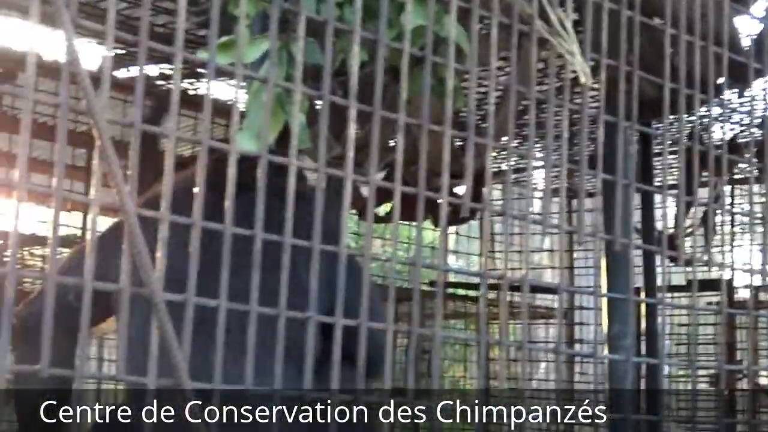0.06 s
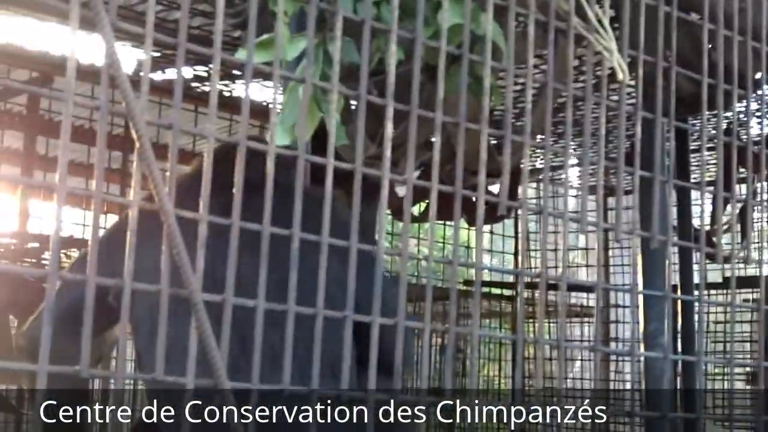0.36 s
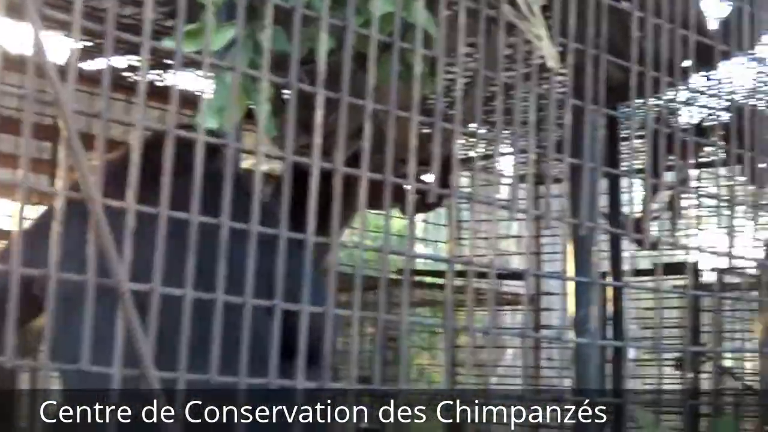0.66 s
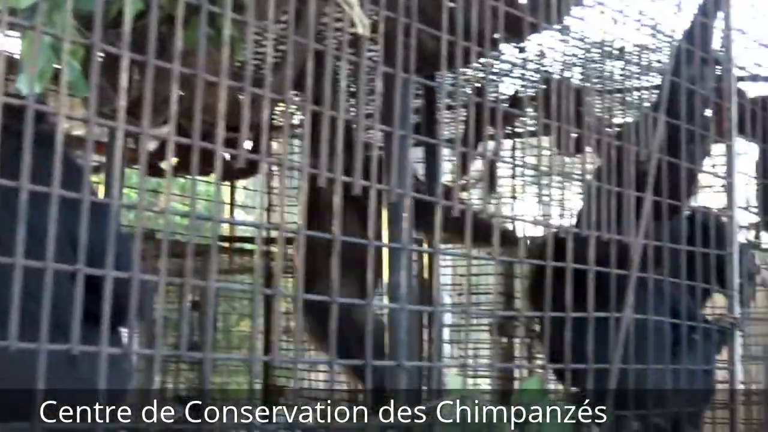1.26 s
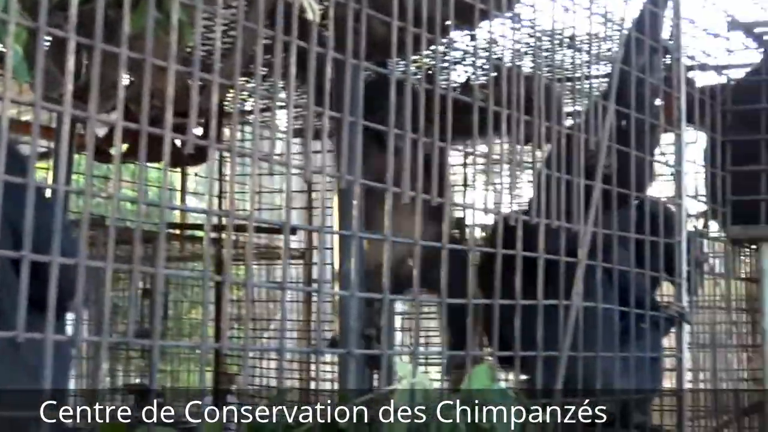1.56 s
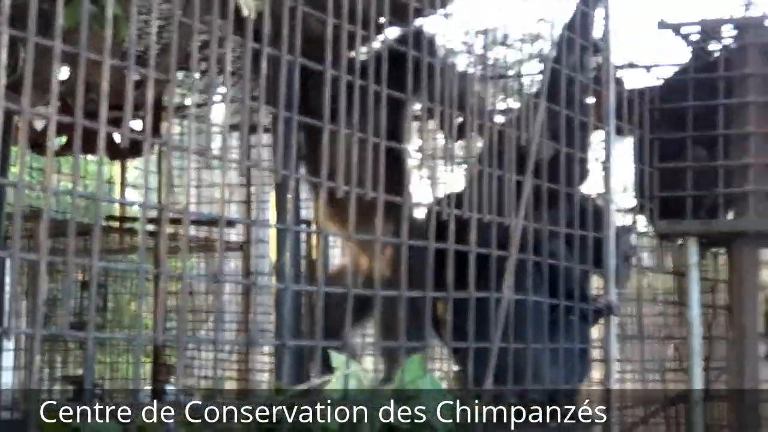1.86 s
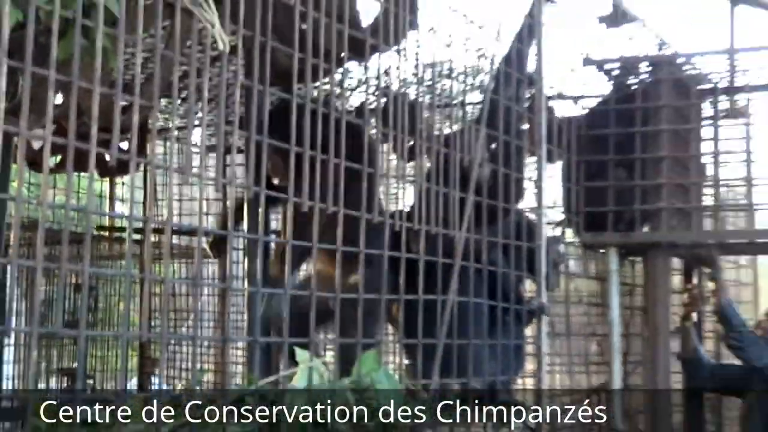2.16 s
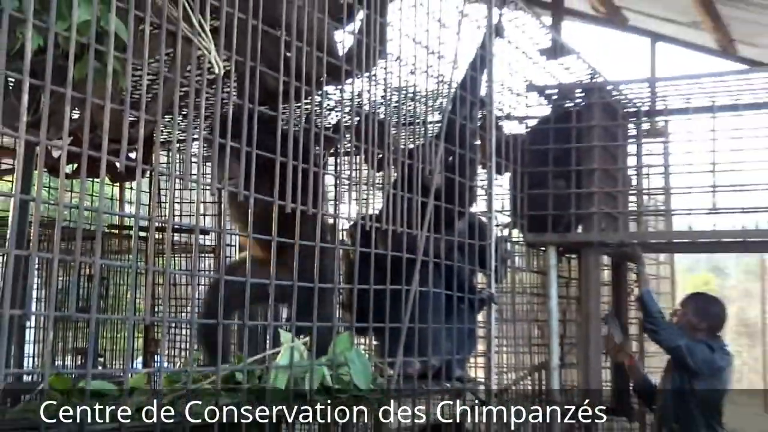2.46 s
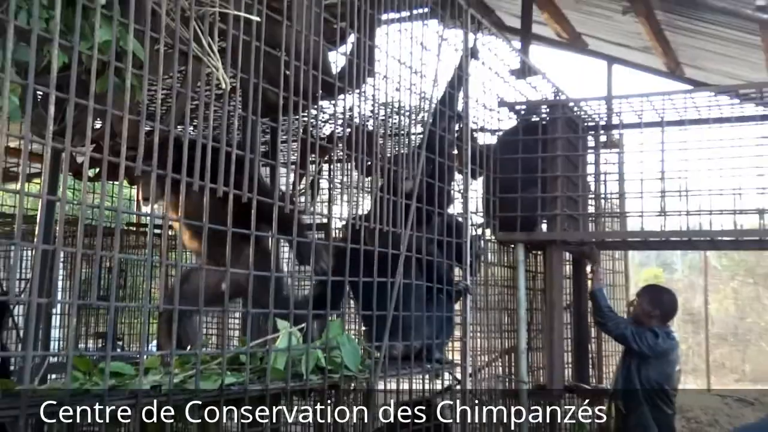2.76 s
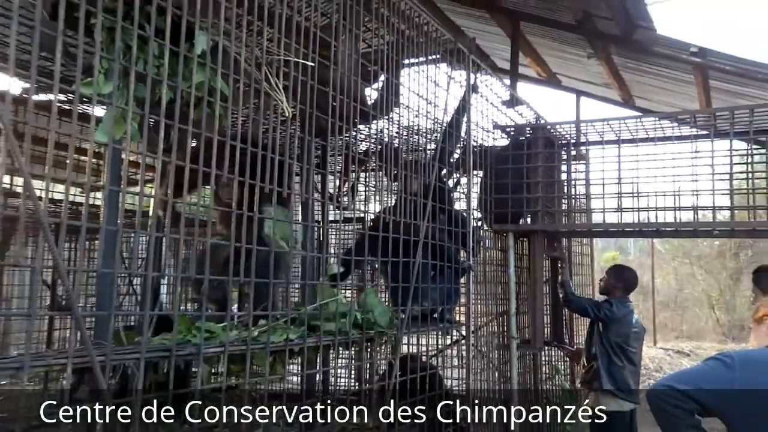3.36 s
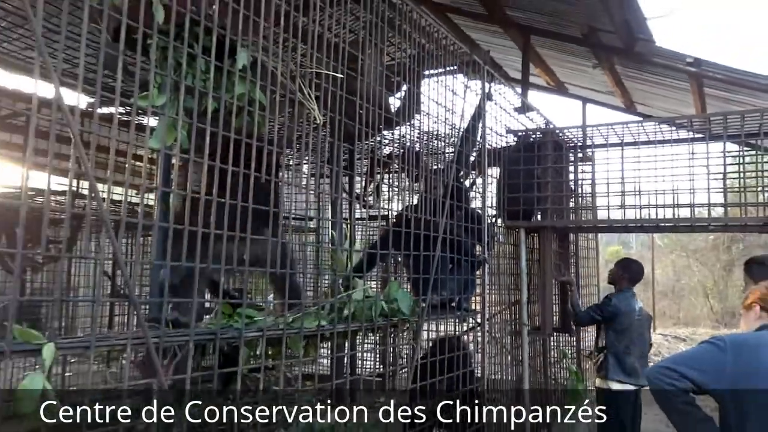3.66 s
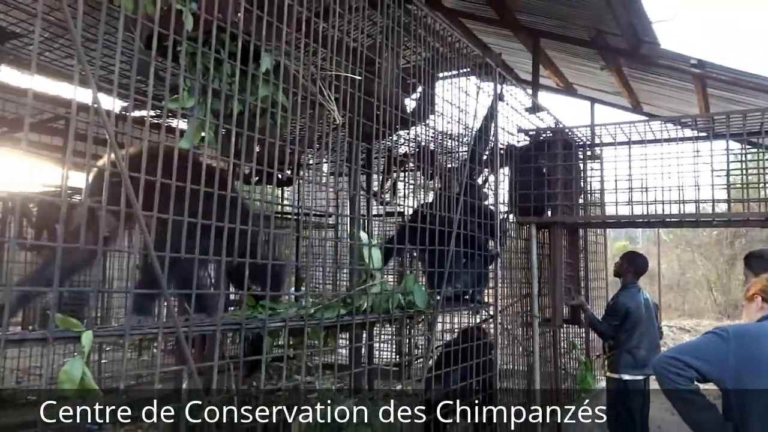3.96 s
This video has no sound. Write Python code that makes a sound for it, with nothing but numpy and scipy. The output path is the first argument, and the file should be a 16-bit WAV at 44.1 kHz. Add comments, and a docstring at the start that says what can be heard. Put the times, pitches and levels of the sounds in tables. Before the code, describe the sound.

Excited chimpanzees scream in quick, harsh bursts, mixed throughout with rising and falling barks and occasional soft hoots. They are heard up close in an outdoor barred enclosure, with a short echo and faint steady background noise.

```python
"""Chimpanzees call excitedly, close by, in a barred enclosure under a sheet roof.
A rasping scream is already ending as the sound begins, over low outdoor noise. Then one animal barks
again and again, each bark rising and falling in pitch, while others answer with screams and a few soft
hoots. Every call is made by vibrating vocal folds and comes with a broad, harsh hiss. The roof throws
each call back and the steel bars ring. Last, a limiter holds the loud calls level."""
import sys
import numpy as np
from scipy import signal
from scipy.fft import rfft, irfft
from scipy.io import wavfile
from scipy.ndimage import minimum_filter1d

SR = 44100
rng = np.random.default_rng(int(sys.argv[2]) if len(sys.argv) > 2 else 0)


def digitize_waveform(pressure):
    """Quantize a signal to 16-bit integers and store it at the path in sys.argv[1].

    Rows of a 2-D input are taken as channels; values are limited to [-1, 1].
    """
    field = np.atleast_2d(pressure).T
    bounded = np.clip(field, -1, 1)
    quanta = np.round(bounded * 32767).astype(np.int16)
    wavfile.write(sys.argv[1], SR, quanta)


N = 176400
TIME = np.arange(N) / SR

# Screams, one a row: (start [s], rise [s], fall [s], start pitch [Hz], top pitch [Hz],
# end pitch [Hz], level [dB], overtones [dB], roughness [0 smooth, about 1 harsh])
SCREAM_CALLS = [ (-.06, 0.034, 0.043, 1144, 1250, 949, -11, 1.5, 1.04),
                (.085, 0.093, 0.089, 1227, 1297, 1135, -8, -0.5, 0.68),
                (.21, 0.054, 0.06, 1122, 1289, 880, 3, 0, 0.62),
                (.345, 0.021, 0.027, 986, 926, 880, -6.5, -12.5, 0.82),
                (.418, 0.05, 0.005, 1349, 1447, 1404, -12.5, -32, 0.6),
                (.533, 0.047, 0.055, 1166, 1327, 809, -5.5, 3, 0.56),
                (.635, 0.019, 0.031, 1193, 1277, 1070, -13, 0.5, 0.83),
                (.835, 0.086, 0.051, 989, 1244, 1124, -11.5, -2, 0.56),
                (.94, 0.033, 0.073, 1353, 1583, 1007, -11, 4.5, 0.94),
                (1.165, 0.055, .07, 989, 1156, 955, -8, -5.5, 0.77),
                (1.346, 0.055, 0.087, 1115, 1670, 1107, -8, 5.5, 0.8),
                (1.512, 0.078, 0.037, 1099, 1212, 848, -10, 1.5, 0.44),
                (1.833, 0.055, 0.097, 1043, 1372, 952, -11.5, 4.5, 0.87),
                (2.116, 0.089, 0.068, 1042, 1163, 1070, -12.5, 1, 0.83),
                (2.30, .05, 0.08, 1380, 1529, 952, -7.5, 4, 0.88),
                (2.365, 0.029, 0.037, 934, 1013, 836, -5, -15, 0.83),
                (2.47, 0.034, 0.07, 1096, 1117, 968, -14, 0, 0.85),
                (2.75, 0.075, 0.046, 1095, 1270, 875, -6.5, 1.5, 0.7),
                (2.865, 0.032, 0.037, 1139, 1238, 995, -16, 5.5, 0.82),
                (3.135, 0.054, 0.081, 935, 1658, 1014, -14, 4, 0.7),
                (3.618, 0.05, 0.042, 1144, 1344, 950, -7.5, 1.5, 0.65),
                (3.925, 0.037, 0.061, 1277, 1529, 1277, -9.5, 3.5, 0.61)]
# Barks: same columns as the screams
BARK_CALLS = [ (.078, 0.059, 0.051, 596.6, 1039, 588, -11, 2, 0.23),
              (.43, .083, 0.04, 448.3, 1066, 698, -11.5, 2.5, 0.22),
              (.818, 0.11, 0.082, 468.2, 1112, 559, -14, -0.5, 0.48),
              (1.125, 0.086, 0.067, 674, 1076, 613, -12, -23, 0.78),
              (1.835, 0.067, 0.082, 624.5, 864, 575, -14, -4.5, 0.37),
              (2.228, .059, 0.073, 544.5, 1106, 587, -3, -0.5, 0.03),
              (2.596, 0.053, 0.084, 520.5, 1083, 535, -4.5, 0, .05),
              (3.012, .06, 0.058, 486.6, 915, 440, -9, -1.5, 0.28),
              (3.565, 0.054, 0.034, 521.4, 912, 597, -10, 1.5, 0.46)]
# Soft hoots and thin held cries: same columns as the screams
HOOT_CALLS = [ (.3, 0.096, 0.088, 1055, 1032, 1067, -19.5, 25, 0),
              (.805, 0.034, 0.0076, 885, 975, 925, -12.5, -19, 0.78),
              (1.797, 0.034, 0.016, 1076, 1170, 1246, -16, -34, 1.04),
              (3.41, 0.029, 0.035, 700, 709, 695, -33.5, -32, 0),
              (3.855, 0.092, 0.038, 770, 919, 830, -16.5, -11, 0.24)]
# How the throat shapes the overtones of screams and hoots: (frequency [Hz], gain [dB])
SCREAM_THROAT = [(1900, 1.5), (2400, -10.5), (2850, -16), (3380, -13.5), (4400, -23.5), (5050, -24),
                 (5600, -27), (8000, -31), (11000, -31.5), (14500, -38)]
# How the throat shapes the overtones of barks: (frequency [Hz], gain [dB])
BARK_THROAT = [(900, 13), (1400, 5.5), (1750, -8), (2200, 4.5), (2750, -2.5), (3200, 4.5), (4200, -6),
               (5500, -6.5), (6500, -6), (7800, -11), (11000, -12.5), (14500, -18)]
# Broad, harsh hiss that comes with each call: (frequency [Hz], level [dB])
HISS_SPECTRUM = [(100, -45), (400, -33), (700, -4), (1150, -7), (1700, 10.5), (2800, -4.5), (3400, -14.5),
                 (4300, 1.5), (8000, -20), (12000, -12.5), (15000, -33)]
# Outdoor noise: (frequency [Hz], level [dB])
OUTDOOR_SPECTRUM = [(25, -22), (80, -5.5), (160, -8), (280, 1), (430, -6.5), (700, 4), (1300, -5),
                    (2500, -8.5), (5000, -16.5), (15000, -29)]
# Echoes from floor, roof and walls: (delay [s], level [dB])
ECHOES = [(.0052, -8.5), (0.0121, -8), (0.033, -9)]
# Notes at which the steel bars ring: (frequency [Hz])
BAR_RINGS_HZ = [2503, 3360, 3296, 4020, 5030, 5940]
# Stereo width, the gain on what differs between left and right: (frequency [Hz], gain [dB])
STEREO_WIDTH = [(30, -2), (200, -20), (5000, -15), (11000, -34)]

# The three voices; call() shows what each setting does. Attack, release and mouth_s are in seconds.
SCREAM = dict(attack=0.012, release=0.026, mouth_s=0.012, rise_bend=2.6, fall_bend=1.8,
              effort_db=1, open_db=12, bright_db=0, closing_db=-3, swell_db=0, hiss_db=-18,
              start_rough=-0.35, end_rough=-0.35, jitter=0.05, smear=0.27, shimmer=0.9,
              flutter_hz=74, flutter=0.75)
BARK = dict(attack=0.0067, release=0.016, mouth_s=0.0025, rise_bend=2.1, fall_bend=1.7,
            effort_db=4.5, open_db=9.5, bright_db=0.1457, closing_db=-4.5, swell_db=-7.5, hiss_db=-14,
            start_rough=0.46, end_rough=0.026, jitter=0.0353, smear=0.36, shimmer=0.22,
            flutter_hz=112.9, flutter=0.88)
HOOT = dict(attack=0.0042, release=0.015, mouth_s=0.036, rise_bend=4.4, fall_bend=1.7,
            effort_db=34, open_db=0, bright_db=1, closing_db=6, swell_db=-6, hiss_db=-5,
            start_rough=0, end_rough=0, jitter=0.039, smear=0.13, shimmer=1,
            flutter_hz=60.4, flutter=0.16)

RASP_HZ, WOBBLE_HZ = 210, 43.1   # speeds of the fast and the slow shaking in a voice
WOBBLE_DEPTH, FLUTTER_BEND, RAGGED_DB = 0.013, 0.052, 5   # all at full roughness
OUTDOOR_DB, OUTDOOR_SWAY_DB = -29.5, 0.7
TAIL_DB, TAIL_T60_S, TREBLE_T60_S, TAIL_SPLIT_HZ = -9.5, 0.74, 0.34, 2100   # T60: time to fade 60 dB
BAR_DB, BAR_T60_S = 4, 0.45
BARK_ROOM_DB, ROOM_SIDE_DB, PAN_DB = -3, 4.5, -0.45
LOW_CUT_HZ, CUTOFF_HZ = 580, 15000
LIMIT_DB, LIMIT_RELEASE_DB_PER_S, LIMIT_ATTACK_S = 0.35, 131, 0.00046


def from_db(db):
    """Turn decibels into a number to multiply by."""
    return 10 ** (np.asarray(db) / 20)


def rms_one(x):
    """Scale a signal to an average power of 1."""
    return x / np.sqrt(np.mean(x ** 2) + 1e-20)


def coloured(x, spectrum):
    """Turn each frequency up or down, following a table."""
    table_hz, table_db = np.transpose(spectrum)
    hz = np.arange(len(x) // 2 + 1) * SR / len(x)
    db = np.interp(np.log(np.maximum(hz, 1)), np.log(table_hz), table_db)
    return irfft(rfft(x) * from_db(db), len(x))


def drift(hz, size):
    """Random wandering up to about the given speed, with a typical size of 1."""
    sos = signal.butter(2, hz, fs=SR, output="sos")
    return rms_one(signal.sosfilt(sos, rng.standard_normal(size + SR // 10))[SR // 10:])


def call(row, voice, throat):
    """One call: effort bends the pitch in an arch and the vocal folds shake, along with a harsh hiss."""
    _, rise, fall, start_hz, top_hz, end_hz, db, overtones_db, rough = row
    t = TIME[:SR // 4]
    size = len(t)
    early = np.sin(np.pi / 2 * np.clip(1 - t / rise, 0, 1))   # 1 to 0 during the rise
    late = np.clip((t - rise) / fall, 0, 1)   # 0 to 1 during the fall
    arch = top_hz + (start_hz - top_hz) * early ** voice["rise_bend"]
    arch += (end_hz - top_hz) * late ** voice["fall_bend"]
    effort = np.log2(arch / top_hz)   # octaves from the top pitch
    rough = np.clip(rough + voice["start_rough"] * early ** 2 + voice["end_rough"] * late ** 2, .02, 1)

    flutter_hz = voice["flutter_hz"] * (1 + 0.095 * drift(WOBBLE_HZ, size))
    flutter = np.sin(2 * np.pi * np.cumsum(flutter_hz) / SR)
    wobble = WOBBLE_DEPTH * drift(WOBBLE_HZ, size) * np.sqrt(rough)
    jitter = voice["jitter"] * drift(RASP_HZ, size)
    hz = arch * (1 + wobble + rough * (jitter + FLUTTER_BEND * flutter))
    phase = 2 * np.pi * np.cumsum(hz) / SR
    closure = phase + voice["smear"] * rough * drift(RASP_HZ, size)   # the folds shut unevenly

    # Overtones are multiples of the pitch. Loudness and the closing mouth set how bright they are.
    tilt_db = voice["bright_db"] * db + voice["closing_db"] * late ** 2   # per octave
    overtones = np.zeros(size)
    for k in range(2, 20):
        waver_db = RAGGED_DB * np.sqrt(rough) * np.tanh(drift(WOBBLE_HZ, size))
        overtones += (k * arch < CUTOFF_HZ) * from_db(tilt_db * np.log2(k) + waver_db) * np.sin(k * closure)
    mouth = np.clip(t / voice["mouth_s"], 0, 1) ** 2   # 0 shut, 1 open
    overtones *= mouth * from_db(overtones_db + voice["open_db"] * effort)
    tone = np.sin(phase) * from_db(voice["swell_db"] * early) + coloured(overtones, throat)
    tone *= 1 + rough * voice["shimmer"] * np.tanh(drift(RASP_HZ, size))   # the rasp
    tone *= 1 + rough * voice["flutter"] * flutter

    hiss = rms_one(coloured(rng.standard_normal(size), HISS_SPECTRUM) * (1 + 0.15 * np.sin(phase)))
    sound = tone + hiss * mouth * np.sqrt(rough) * from_db(voice["hiss_db"] + overtones_db / 2)
    sound /= np.sqrt(np.mean(sound[t < rise + fall] ** 2))
    fade_in = np.clip(t / voice["attack"], 0, 1)
    fade_out = np.clip((rise + fall - t) / voice["release"] + .5, 0, 1)
    return sound * fade_in * fade_out * from_db(db + voice["effort_db"] * effort)


def calls(rows, voice, throat):
    """Play a table of calls in one voice."""
    out = np.zeros(N + 2 * SR)   # a spare second at each end
    for row in rows:
        sound = call(row, voice, throat)
        at = int((row[0] + 1) * SR)
        out[at:at + len(sound)] += sound
    return out[SR:SR + N]


def screams():
    """High calls that rasp because the vocal folds vibrate unevenly."""
    return calls(SCREAM_CALLS, SCREAM, SCREAM_THROAT)


def outdoors():
    """Low outdoor noise whose level sways a little."""
    level = from_db(OUTDOOR_DB + OUTDOOR_SWAY_DB * drift(16, N))
    return level * rms_one(coloured(rng.standard_normal(N), OUTDOOR_SPECTRUM))


def enclosure(x):
    """A few hard echoes, a blurred tail whose treble dies sooner, and steel bars that ring along."""
    t = TIME[:SR]
    noise = rng.standard_normal(len(t))
    low = signal.sosfilt(signal.butter(2, TAIL_SPLIT_HZ, fs=SR, output="sos"), noise)
    high = signal.sosfilt(signal.butter(2, TAIL_SPLIT_HZ, "high", fs=SR, output="sos"), noise)
    low_fade, high_fade = from_db(-60 * t / TAIL_T60_S), from_db(-60 * t / TREBLE_T60_S)
    tail = (low * low_fade - 2.05 * high * high_fade) * np.clip(t / 0.0048, 0, 1)
    response = from_db(TAIL_DB) * tail / np.sqrt(np.sum(low_fade ** 2))
    for delay, db in ECHOES:
        response[int(delay * rng.uniform(.9, 1.1) * SR)] += from_db(db)
    bar_fade = from_db(-60 * t / BAR_T60_S)
    for hz in BAR_RINGS_HZ:
        response += from_db(BAR_DB) * 2 * bar_fade / bar_fade.sum() * np.sin(2 * np.pi * hz * t)
    return signal.fftconvolve(x, response)[:N]


def barks():
    """The mouth snaps open; the voice gets louder and brighter as its pitch climbs, then drops."""
    return calls(BARK_CALLS, BARK, BARK_THROAT)


def hoots():
    """Soft hoots and thin held cries, with the mouth opening more slowly."""
    return calls(HOOT_CALLS, HOOT, SCREAM_THROAT)


def scene():
    """The animals are just right of centre; echoes and outdoor noise make the sound wide."""
    barker = barks()
    others = screams() + hoots()
    to_room = from_db(BARK_ROOM_DB) * barker + others   # the barker is nearer, so it echoes less
    mid = barker + others + enclosure(to_room) + outdoors()
    side = coloured(from_db(ROOM_SIDE_DB) * enclosure(to_room) + outdoors(), STEREO_WIDTH)
    return np.array([(mid + side) * from_db(PAN_DB), (mid - side) * from_db(-PAN_DB)])


def record(dry):
    """Thin the bass, turn loud peaks down (a limiter), clip what slips by, cut the highest treble."""
    thinned = signal.sosfilt(signal.butter(1, LOW_CUT_HZ, "high", fs=SR, output="sos"), dry)
    peak = -minimum_filter1d(-np.abs(thinned).max(axis=0), size=44)   # looks slightly ahead
    over_db = np.maximum(20 * np.log10(peak + 1e-9) - LIMIT_DB, 0)
    release_db = LIMIT_RELEASE_DB_PER_S * TIME
    held_db = np.maximum.accumulate(over_db + release_db) - release_db
    smoothing = np.exp(-1 / (LIMIT_ATTACK_S * SR))
    limited = thinned * from_db(-signal.lfilter([1 - smoothing], [1, -smoothing], held_db))
    treble_cut = signal.cheby2(12, 50, CUTOFF_HZ + 600, fs=SR, output="sos")
    return signal.sosfiltfilt(treble_cut, np.clip(limited, -.96, .96))


dry = scene()
out = record(dry)
digitize_waveform(out)
```